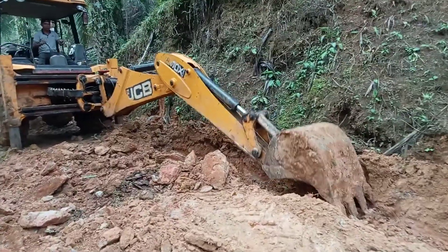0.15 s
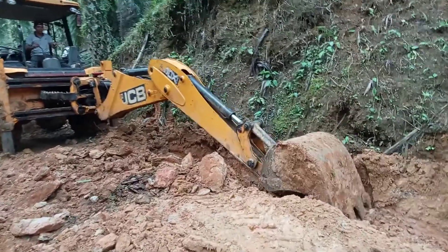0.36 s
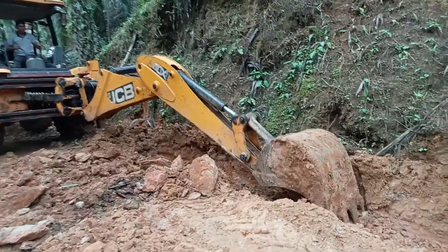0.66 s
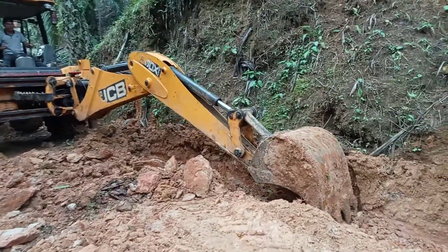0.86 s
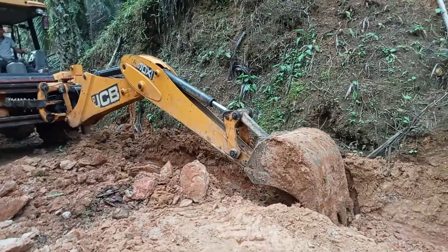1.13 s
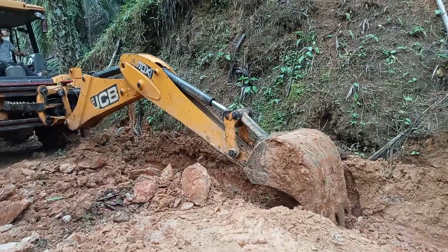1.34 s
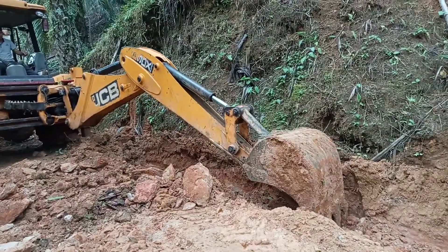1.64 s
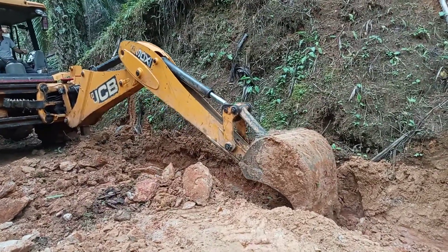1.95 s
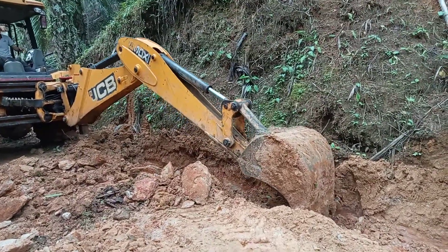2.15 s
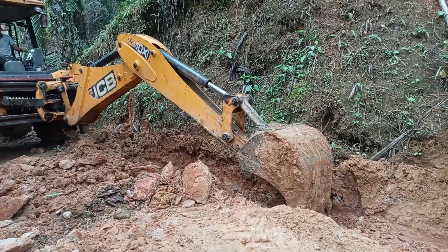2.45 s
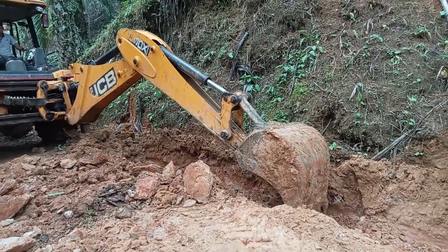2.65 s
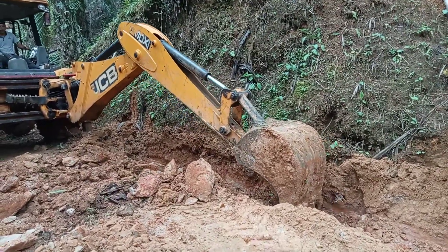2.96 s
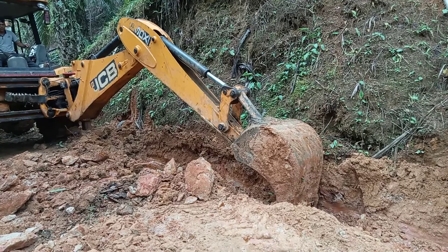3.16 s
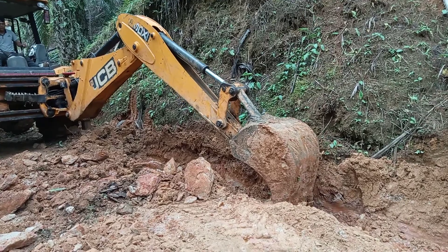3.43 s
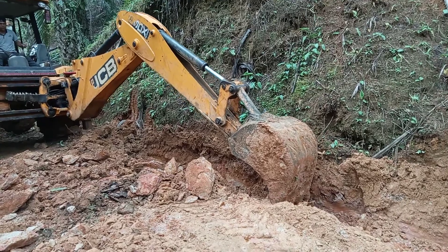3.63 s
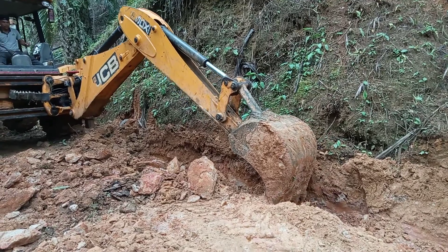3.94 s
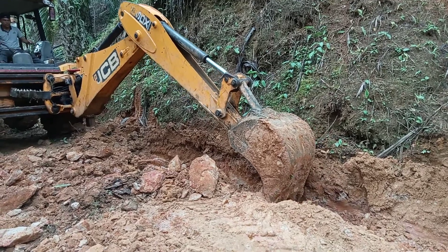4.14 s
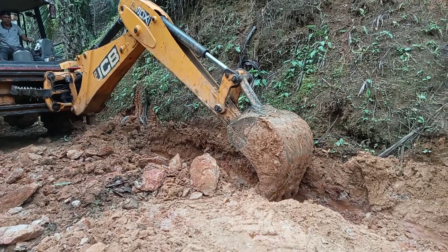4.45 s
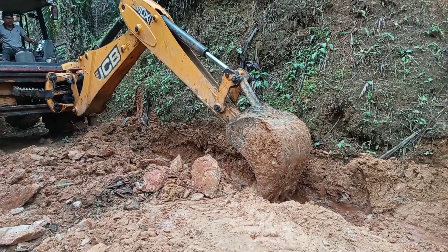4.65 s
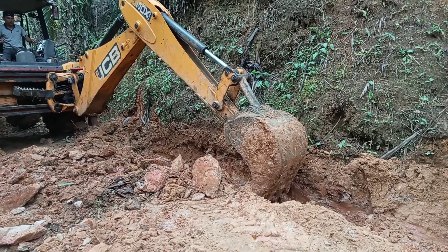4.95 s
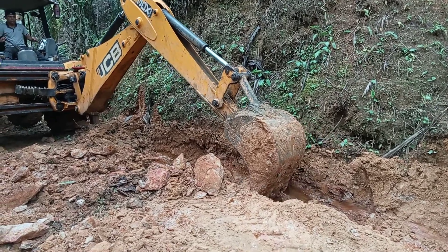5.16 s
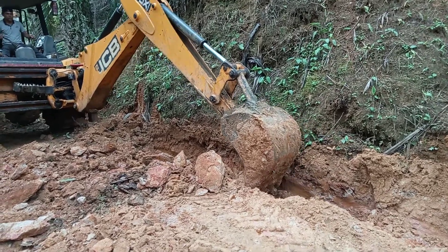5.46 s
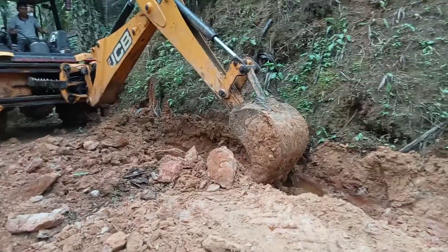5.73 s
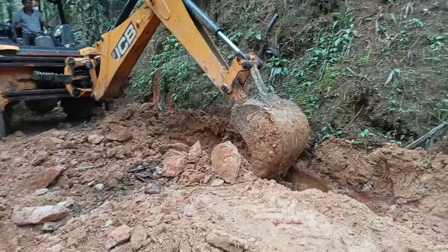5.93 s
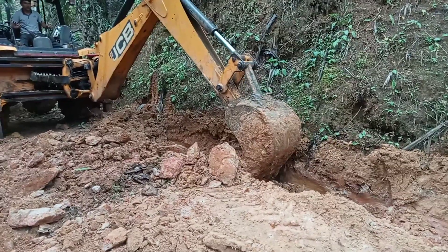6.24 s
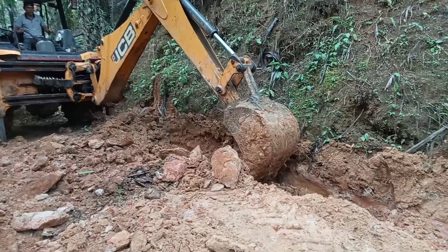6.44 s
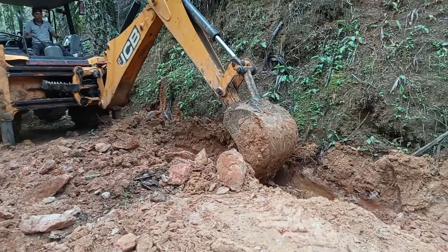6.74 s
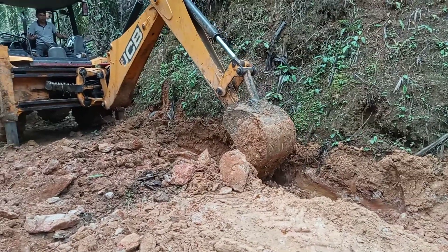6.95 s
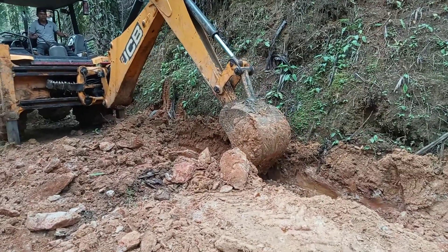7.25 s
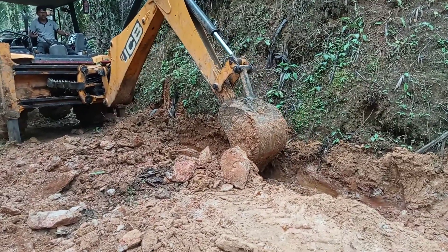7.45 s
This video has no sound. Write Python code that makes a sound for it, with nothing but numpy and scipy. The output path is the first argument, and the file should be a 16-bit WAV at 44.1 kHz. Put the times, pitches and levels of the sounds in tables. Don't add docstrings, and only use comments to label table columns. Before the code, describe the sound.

Close loud backhoe engine drone with knock, rattle and thin whistle; an opening bucket crash and scrape, later a clank and bursts of hydraulic hiss.

```python
import sys
import numpy as np
from scipy import signal
from scipy.io import wavfile
from scipy.ndimage import uniform_filter1d

SR = 44100
rng = np.random.default_rng(int(sys.argv[2]) if len(sys.argv) > 2 else 0)


def to_linear_factor(level_db):
    exponent = np.asarray(level_db, float) / 20
    return 10 ** exponent


def int16_out(signal):
    q = np.round(np.clip(np.atleast_2d(signal).T, -1, 1) * 32767)
    wavfile.write(sys.argv[1], SR, q.astype(np.int16))


N = 334713


def evened(x):
    return x / np.sqrt(np.mean(x ** 2) + 1e-20)


def curves(rows, outside=None):
    s, *columns = np.transpose(rows)
    t = np.arange(N) / SR
    return [np.interp(t, s, column, outside, outside) for column in columns]


def swells(rows, rise, fall, size=N):
    t = np.arange(size) / SR
    levels = []
    for s, hold, top in rows:
        before, after = np.maximum(s - t, 0), np.maximum(t - s - hold, 0)
        levels.append(top - rise * before - fall * after)
    return np.max(levels, axis=0)


def wander(rate, size=1):
    knots = rng.standard_normal(int(N / SR * rate) + 2)
    return evened(np.interp(np.arange(0, N, size) * rate / SR, np.arange(len(knots)), knots))


def resonate(x, hz, width):
    turn = np.exp(2j * np.pi * np.cumsum(hz * np.ones(len(x))) / SR)
    r = np.exp(-np.pi * width / SR)
    return 2 * (turn * signal.lfilter([1 - r], [1, -r], x / turn)).real


def filtered(x, order, edges_hz, kind="band"):
    return signal.sosfilt(signal.butter(order, edges_hz, kind, fs=SR, output="sos"), x)


def coloured(points, patchy_db):
    hz = np.fft.rfftfreq(2048, 1 / SR)
    a, b, patches = rng.standard_normal((N // 512 + 5, 1025, 3)).T
    patches = uniform_filter1d(patches, size=14, axis=0)
    patches = evened(uniform_filter1d(patches, size=6, axis=1))
    f, db = np.transpose(points)
    shape_db = np.interp(np.log(hz + 1), np.log(f + 1), db, -120, -120)
    spectrum = (a + 1j * b) * to_linear_factor(shape_db[:, None] + patchy_db * patches)
    return evened(signal.istft(spectrum, nperseg=2048, noverlap=1536)[1][:N])


# t/s, rate/four-stroke cycles per s
SPEED = [(0.0, 17.842), (0.69, 17.721), (1.38, 17.582), (2.07, 17.675), (2.76, 17.569), (3.45, 17.671),
         (4.14, 17.583), (4.83, 17.582), (5.52, 17.572), (6.21, 17.598), (6.9, 17.524), (7.59, 17.6)]


def cycles():
    return np.cumsum(curves(SPEED)[0]) / SR


THUMP_AT = 1.25

# f/Hz, level/dB per Hz
ROAR_LOW = [(25, -28), (50, -26), (75, -10), (105, -7.5), (170, 0.5), (250, -6), (310, -8.5), (400, -9.5),
            (500, -13), (560, -14), (670, -22.5), (1000, -11.5), (1250, -13.5), (1600, -21), (1800, -27)]
# f/Hz, level/dB per Hz
ROAR_HIGH = [(1400, -3), (1600, -9), (1850, -2), (2400, 1), (2850, -2.5), (3300, -0.5), (3750, -5.5),
             (4200, -15.5), (5050, -27), (5600, -19.5), (6200, -22.5), (7500, -16), (8400, -25),
             (11100, -31), (13000, -23.5), (15500, -29.5)]


def roar():
    shake = np.maximum(swells([(.3, .04, 0.83)], 4.7, 4), 0)
    low_db = -35.5 + 6 * shake + 0.2 * wander(2.5)
    puff_db = 4 * np.exp(-((cycles() % 2 - THUMP_AT) / .2) ** 2)
    low = to_linear_factor(low_db + puff_db) * coloured(ROAR_LOW, 1.5)
    high = coloured(ROAR_HIGH, 1)
    air = filtered(high, 4, 4800, "high")
    air_db = -1.8 + 4 * shake + .8 * wander(14)
    high = high + (to_linear_factor(air_db) - 1) * air
    return low + to_linear_factor(-39 + 6.5 * shake) * high


# f/multiple of the cycle rate, level/dB rms
TONES = [(3.0, -67), (3.5, -63), (4.0, -48), (6.0, -57), (8.0, -42), (8.5, -54), (9.5, -46), (10.5, -43),
         (11.5, -53), (12.0, -46), (13.0, -57), (13.5, -53), (14.5, -53), (15.0, -56), (18.0, -62),
         (21.0, -52), (22.0, -56), (23.0, -60), (24.0, -56), (25.5, -55), (26.0, -53), (26.5, -60),
         (27.5, -56), (28.0, -52), (30.0, -61), (36.0, -64), (52.0, -60), (54.5, -62), (58.0, -57),
         (76.0, -61)]


def tones():
    step = 8
    turned = cycles()[::step] - THUMP_AT
    fan_slip = .15 * wander(1, size=step)
    total = np.zeros(len(turned))
    for k, db in TONES:
        low = k < 16
        phase = 2 * np.pi * k * turned + (.4 if low else 3) * rng.standard_normal()
        phase += .4 * wander(4, size=step)
        if k % 10.5 == 0:
            phase += k * fan_slip
        total -= to_linear_factor(db + (3 if low else 4.5)) * (1 + .16 * wander(6, size=step)) * np.cos(phase)
    return signal.resample_poly(total, step, 1)[:N]


# t/cycles into the gear pattern, level/dB
KNOCKS = [(1.96, 0), (.45, -4), (.94, -2), (1.44, 1)]
# f/Hz, width/Hz, level/dB
BLOCK = [(840, 44, -18), (1006, 61, 6.5), (1330, 55, 0), (1816, 20, 8.5), (1925, 40, 6.5), (2200, 33, 2.5),
         (2380, 40, 7.5), (2462, 36, 7), (3230, 54, 2.5)]


def knock():
    turned = cycles()
    gate = sum(to_linear_factor(db) * np.exp(-((turned - at) % 2) / .07) for at, db in KNOCKS)
    alike = rng.standard_normal(1250)[(turned * 2 % 1 * 1250).astype(int)]
    drive = gate * to_linear_factor(2.2 * wander(35)) * (alike + 0.88 * rng.standard_normal(N))
    block = sum(to_linear_factor(db) * evened(resonate(drive, hz, width)) for hz, width, db in BLOCK)
    return to_linear_factor(-45) * evened(filtered(block, 6, (650, 3800)))


# t/s, level/dB rms
PANEL = [(0, -49), (1.2, -43.5), (2.2, -45.5), (3.3, -43.5), (3.6, -49), (4.6, -44.5), (5.8, -43.5),
         (6.6, -47.5), (7.59, -47)]


def panel():
    mode_hz = 1200
    gate = .5 + np.exp(-((cycles() % 2 - 1.22) / .3) ** 4)
    shaking = gate * to_linear_factor(1.5 * wander(9)) * rng.standard_normal(N)
    rattle = resonate(shaking, mode_hz, 75)
    return to_linear_factor(curves(PANEL)[0] - 1.0) * evened(resonate(rattle, mode_hz, 24))


# t/s, f/Hz, level/dB
TURBO = [(0, 7100, -48), (.17, 7460, -53), (.38, 7450, -49.5), (.7, 7090, -50), (1.25, 6870, -54),
         (1.6, 6850, -45.5), (2, 6870, -51), (2.5, 6770, -48.5), (3.8, 6795, -48.5), (6, 6840, -47.5),
         (7.59, 6840, -50.5)]


def turbo():
    hz, db = curves(TURBO)
    core_noise, skirt_noise = rng.standard_normal((2, N))
    core = evened(resonate(resonate(core_noise, hz, 54), hz, 320))
    skirt = evened(resonate(resonate(skirt_noise, hz - 120, 260), hz - 120, 370))
    return to_linear_factor(db + 1.0 * wander(30)) * evened(core + 0.67 * skirt)


# t/s, hold/s, level/dB, centre f/Hz
PULLS = [
    (1.842, .65, -44.5, 3594),
    (2.9, 0.55, -48.5, 3260),
    (4.198, 0.18, -44.5, 3500),
    (4.4, 0.37, -42, 3250),
    (5.604, .1, -47, 3250),
    (5.91, 0.59, -34, 3450),
    (6.65, 0.95, -52, 3390),
]
# f/share of the centre, level/dB
PIPES = [(1, 3), (1.03, -2.5), (.94, -1), (.87, -7.5)]


def valve():
    hard_db = -38
    ends = []
    for s, hold, db, hz in PULLS:
        lift = hold * 280 * (db > hard_db)
        ends += [(s, hz), (s + hold, hz + lift)]
    hz = curves(sorted(ends))[0]
    db = swells([row[:3] for row in PULLS], 260, 120)
    t = np.arange(N) / SR
    bounce = np.cos(np.pi * 7.3 * (t - 5.858)) ** 10
    shut = bounce * np.clip((db - hard_db) / 3, 0, 1)
    drive = to_linear_factor(.9 * wander(40)) * rng.standard_normal(N)
    pipes = sum(to_linear_factor(g) * resonate(resonate(drive, hz * k, 72), hz * k, 260) for k, g in PIPES)
    return to_linear_factor(db - 7 * shut) * evened(pipes)


# t/s, hold/s, level/dB
THUDS = [
    (.08, .015, -30),
    (.19, .03, -37),
    (.296, .02, -28),
]


def ground():
    spectrum = [(45, -25), (70, 3), (110, 6), (200, -3), (400, 0), (560, -19)]  # f/Hz, level/dB
    return to_linear_factor(swells(THUDS, 350, 230)) * coloured(spectrum, 0.96)


# t/s, hold/s, level/dB
SPRAYS = [
    (.146, .106, -46.5),
    (.295, .35, -59),
    (.89, .06, -55),
    (.96, 0.07, -49.5),
    (1.216, .088, -59),
]
# f/Hz, level/dB
SPRAY = [(4600, -24), (6600, -9), (7400, 4), (8300, -14), (10000, -12), (11500, -11), (12500, -3),
         (14000, -13), (15600, -13)]
# t/s, level/dB, f/Hz, width/Hz
TICKS = [
    (.634, -53, 8200, 400),
    (5.314, -56, 11500, 9000),
]


def soil():
    db = swells(SPRAYS, 900, 700)
    out = to_linear_factor(db + 2.2 * wander(90.4)) * coloured(SPRAY, 2.0)
    for s, db, hz, width in TICKS:
        puff = rng.standard_normal(500) * np.hanning(500) ** 2
        out[round(s * SR):][:500] += to_linear_factor(db) * evened(resonate(resonate(puff, hz, width), hz, width))
    return out


def ring(modes, share):
    t = np.arange(4000) / SR
    place = np.array(modes)[:, 0] / 1400 + rng.random()
    signs = np.sign(np.cos(2 * np.pi * place))
    spot = to_linear_factor(1.5 * rng.standard_normal(len(modes))) * signs
    return sum(g * to_linear_factor(db - 60 * t / (t60 * share)) * np.sin(2 * np.pi * hz * t)
               for (hz, db, t60), g in zip(modes, spot))


# f/Hz, level/dB, t60/s
PLATE = [(490, -11, 0.18), (770, -10, 0.14), (890, -3, 0.12), (1038, 5, 0.052), (1137, 3.5, 0.041),
         (1214, -2, 0.2), (1335, -4.5, 0.091)]
WALLS = [(1690, -9, 0.06), (1735, -6, 0.069), (1835, -5.5, 0.097), (1960, -1, 0.05), (2240, 8.5, 0.025),
         (2220, -7, 0.063), (2340, -9, 0.071), (2530, -19, 0.11)]
TEETH = [(2785, -1.5, 0.1), (2856, -3, 0.044), (3060, 9.5, 0.05), (3355, -4, 0.13), (3500, -7, 0.069),
         (3620, -1, 0.065), (3910, -1.5, 0.042), (3900, 0, 0.037), (4300, -4, 0.046)]
# t/s, level/dB, ring time/share of free ringing
HEEL_BLOWS = [(.226, -15.5, .5), (.236, -11, .45), (.245, -16, 0.51), (.267, -11.5, 0.75), (.322, -8, 0.43),
              (.334, -11, 1.3), (.405, -20, 0.65)]
TIP_BLOWS = [(.2915, 2, .36), (.298, -2, .35), (.309, -1, .3), (.312, -1.5, .25), (.351, -17, .3),
             (.400, -5, 0.53)]
SIDE_BLOWS = [(1.038, -1.5, 0.48), (1.049, -9, .4), (1.056, -10, .55), (1.063, -12, 0.59)]
# t/s, hold/s, plate level/dB, walls level/dB, teeth level/dB
GRINDS = [(0.079, 0.012, -30, -39, -44), (0.228, .045, -34, -39, -44), (0.295, 0.019, -16.5, -21, -18.5),
          (.33, 0.075, -25.5, -24, -25), (.41, 0.058, -37, -33, -28.5), (0.61, .03, -43, -45, -45),
          (0.769, .02, -32.5, -42, -52), (1.04, 0.019, -30.5, -24, -44), (1.057, 0.09, -34, -33.5, -52)]


def bucket():
    n = 60000
    places = [((0, -11, -25), HEEL_BLOWS),
              ((-6.5, -7, -0.99), TIP_BLOWS),
              ((-19, -1.6, -24), SIDE_BLOWS)]
    rise_ms = (2.3, 0.99, 0.18)
    grind_fade = (250, 230, 110)
    steel = np.zeros(n)
    for k, part in enumerate((PLATE, WALLS, TEETH)):
        onset = np.minimum(np.arange(4000) / (rise_ms[k] * SR / 1000), 1)
        for place_db, blows in places:
            for s, strength_db, share in blows:
                tap = ring(part, share) * onset
                steel[round(s * SR):][:4000] += to_linear_factor(strength_db + place_db[k] - 1.5) * tap / abs(tap).max()
        rows = [(s, hold, parts_db[k]) for s, hold, *parts_db in GRINDS]
        grind_db = swells(rows, 1600, grind_fade[k], size=n)
        grit = rng.standard_normal(n) * to_linear_factor(1.3 * wander(150)[:n])
        steel += to_linear_factor(grind_db - 2.5) * evened(signal.oaconvolve(grit, ring(part, 0.19))[:n])
    steel = filtered(steel, 6, (423, 4350))
    fine = evened(filtered(rng.standard_normal(n), 2, (5400, 8600)))
    fine_db = swells([(.293, 0.009, -37.5)], 4000, 83, size=n) + 1.8 * wander(119)[:n]
    return np.pad(steel + to_linear_factor(fine_db) * fine, (0, N - n))


def scene():
    engine = roar() + tones() + knock() + panel() + turbo()
    digging = valve() + ground() + soil() + bucket()
    return (engine + digging)[None]


def top_cut(x):
    return signal.sosfilt(signal.butter(12, 15770, fs=SR, output="sos"), x)


def record(dry):
    rounded = 1.5 * np.tanh(dry / 1.5)
    lowpass = signal.firwin(401, 15600, window=("kaiser", 10), fs=SR)
    limited = signal.oaconvolve(rounded, lowpass[None], "same")
    return top_cut(limited)


dry = scene()
out = record(dry)
int16_out(out)
```